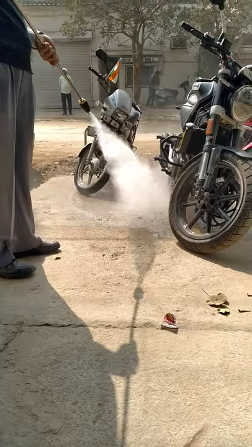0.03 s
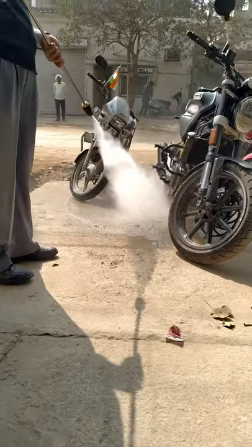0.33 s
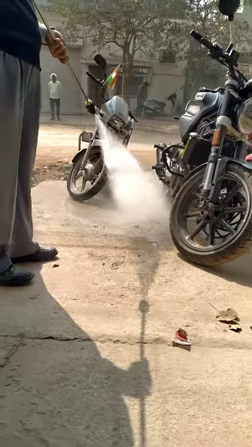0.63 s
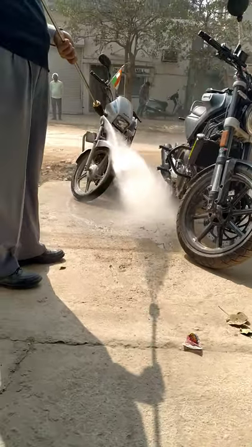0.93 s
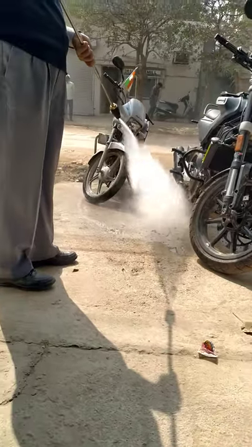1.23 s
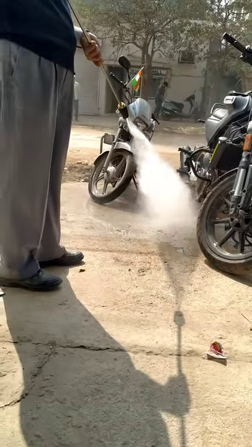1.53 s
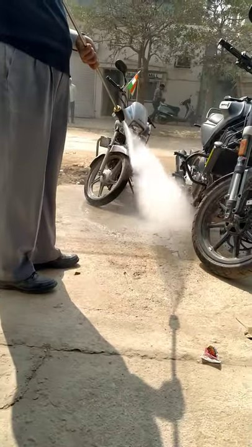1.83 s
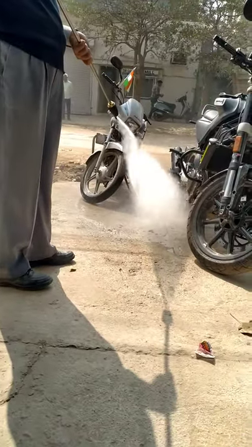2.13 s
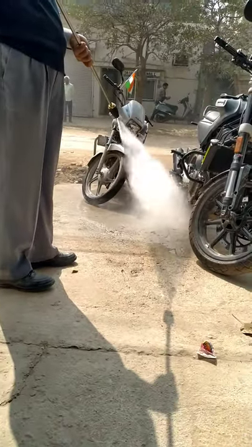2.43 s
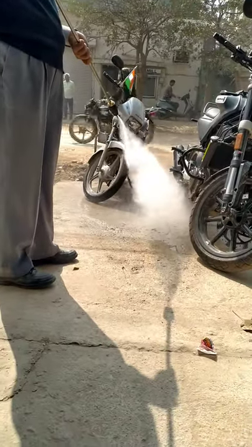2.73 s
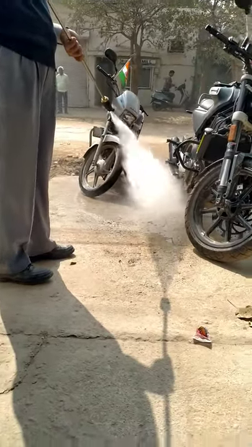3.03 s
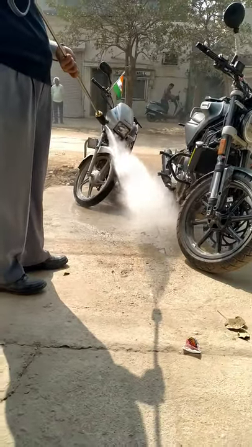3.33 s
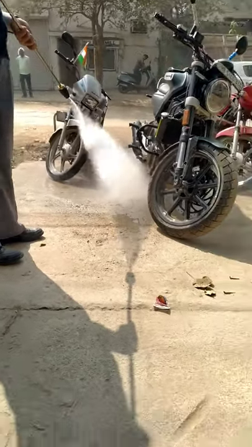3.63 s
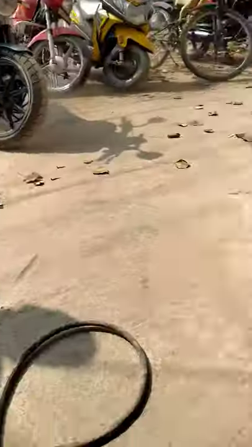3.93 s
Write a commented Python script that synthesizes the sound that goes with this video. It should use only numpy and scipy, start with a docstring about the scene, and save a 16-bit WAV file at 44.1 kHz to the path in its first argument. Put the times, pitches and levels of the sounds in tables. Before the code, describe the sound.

Steady, loud hiss and splatter of a pressure washer jet, with its motor humming underneath.

```python
"""A pressure washer's jet sprays a parked motorcycle and the concrete of an open yard.
The jet hisses, fluttering as the sheet of water tears and pulsing faintly with the pump.
The spray rushes where it lands, larger drops patter, and the air it drags along rumbles.
The pump and a second motor hum nearby, and a motorbike rides by over low street noise."""
import sys
import numpy as np
from scipy import signal
from scipy.fft import rfft, irfft
from scipy.io import wavfile

SR = 44100
rng = np.random.default_rng(int(sys.argv[2]) if len(sys.argv) > 2 else 0)


def log_audio(samples):
    """Write samples as a 16-bit WAV file to the path given in sys.argv[1]."""
    # one column per channel
    frames = np.atleast_2d(samples).T
    # limit to full scale, then quantise
    limited = np.clip(frames, -1, 1)
    pcm = np.round(limited * 32767).astype(np.int16)
    wavfile.write(sys.argv[1], SR, pcm)


N = 176400
TIME = np.arange(N) / SR
DIRECT_SHARE = 0.11   # share of the hiss and splash power that arrives straight, not diffuse

# The hiss as the lance moves. Each row: time in seconds, level in dB before the trim.
JET_LEVEL = [(0.05, -23.9), (0.45, -23.5), (0.9, -23.0), (1.3, -23), (1.9, -22.5), (2.3, -23.1), (2.7, -23),
             (3.3, -23.5), (3.85, -23.5), (4, -25.0)]
# The jet's bright colour. Each row: frequency in Hz, relative level in dB.
JET_COLOUR = [(900, -23.5), (2000, -10), (3000, -7.5), (4300, -6), (5400, -6), (6100, -2.5), (6800, -0.9),
              (7500, 1), (8200, -4)]
def jet(stroke, trim_db=3, flutter_db=.45, pulse_depth=.06):
    """The nozzle's hiss flutters as the sheet of water tears, and swells with each pump stroke."""
    level = from_db(in_time(JET_LEVEL) + trim_db + flutter_db * drift(rate_hz=90))
    pulse = 1 + pulse_depth * np.sin(stroke)
    return level * pulse * stereo_noise(JET_COLOUR, DIRECT_SHARE)


# The weight of the landing spray. Each row: time in seconds, level in dB before the trim.
SPLASH_LEVEL = [(0.05, -30), (0.45, -30.5), (1.3, -30.5), (1.62, -29.5), (2.2, -30.5), (2.8, -30),
                (3.3, -30.5), (3.85, -30), (4, -32)]
# Its midrange body. Each row: frequency in Hz, relative level in dB.
SPLASH_COLOUR = [(200, -11), (400, -1), (600, -0.5), (850, -1), (1080, -3.5), (1300, 0.4), (1550, 0),
                 (2300, -2.5), (3200, -12), (6000, -21)]
def splash(trim_db=2.5, flutter_db=0.6):
    """Spray lands on metal and concrete with a fluttering rush."""
    level = from_db(in_time(SPLASH_LEVEL) + trim_db + flutter_db * drift(rate_hz=45))
    return level * stereo_noise(SPLASH_COLOUR, DIRECT_SHARE)


def drops(per_second=2500, spread_db=3.5, ring_cycles=4, level_db=-34):
    """Larger drops strike at random in each ear, each a tick that dies within a few cycles."""
    patter = np.zeros((2, N))
    pitches = np.geomspace(900, 7400, 14)
    for hz in pitches:
        hits = rng.random((2, N)) < per_second / len(pitches) / SR
        sizes = from_db(spread_db * np.minimum(rng.exponential(1, N), 5)) * rng.choice([-1, 1], N)
        decay = np.exp(-np.log(1000) * hz / (ring_cycles * SR))
        resonator = [1, -2 * decay * np.cos(2 * np.pi * hz / SR), decay * decay]
        patter += signal.lfilter([1, 0, -1], resonator, hits * sizes + 1e-18)
    return from_db(level_db) * rms_one(patter)


# The surges of the low end. Each row: time in seconds, level in dB before the trim.
RUMBLE_LEVEL = [(0.05, -33), (0.25, -41), (0.33, -31.5), (0.42, -38), (0.68, -32.5), (0.8, -32.5),
                (1.05, -34), (1.6, -32.5), (2.2, -35), (2.5, -33), (3.05, -35), (3.25, -31), (4, -34.5)]
# Its dark colour. Each row: frequency in Hz, relative level in dB.
RUMBLE_COLOUR = [(60, -27.5), (120, -7.5), (200, 2), (260, 0), (350, -4.5), (500, -13), (1000, -25.5)]
def rumble(trim_db=-1, lumps_db=1.44):
    """Air dragged along by the spray makes a lumpy, low turbulence."""
    level = from_db(in_time(RUMBLE_LEVEL) + trim_db + lumps_db * drift(rate_hz=14))
    return level * stereo_noise(RUMBLE_COLOUR)


# The pump's pace. Each row: time in seconds, strokes per second.
PUMP_SPEED = [(0, 133.7), (0.5, 133.3), (1.3, 134.25), (2.9, 134.2), (3.5, 134.8), (4, 134.3)]
def pump_stroke():
    """The pump's phase, one turn a stroke, at a nearly steady speed."""
    return turning(in_time(PUMP_SPEED))


# The pump's voice. Each row: multiple of the stroke rate, rms level in dB before the trim.
PUMP_TONES = [(0.871, -41.5), (1.0, -37), (7.98, -45.5), (11.02, -49), (19.0, -50)]
def pump(stroke, hum_trim_db=0.1, whine_trim_db=-0.5):
    """The washer's pump sounds two beating hum tones under a thin whine."""
    hum = sum(tone(k * stroke, db + hum_trim_db, waver_db=1.5, waver_hz=1.5)
              for k, db in PUMP_TONES if k <= 1)
    whine = sum(tone(k * stroke, db + whine_trim_db, waver_db=0.5, waver_hz=2.4)
                for k, db in PUMP_TONES if k > 1)
    return hum + whine


# The motor's partials. Each entry: multiple of the shaft rate.
MOTOR_ORDERS = [3, 9, 10, 12, 13, 14, 15, 40, 76, 90]
# Their mix. Each entry: rms level in dB.
MOTOR_DB = [-40, -46.5, -46, -50, -53, -48.5, -51, -50, -52.5, -49.5]
def motor(shaft_hz=24.29, wobble_hz=0.021):
    """A second motor drones at a steady speed; its upper tones waver more."""
    shaft = turning(shaft_hz + wobble_hz * drift(rate_hz=2))
    drone = tone(MOTOR_ORDERS[0] * shaft, MOTOR_DB[0], waver_db=0.5, waver_hz=1.7)
    return drone + sum(tone(k * shaft, db, waver_db=2.5, waver_hz=1.8)
                       for k, db in zip(MOTOR_ORDERS[1:], MOTOR_DB[1:]))


# The exhaust's partials. Each entry: multiple of the firing rate.
EXHAUST_ORDERS = [2, 3, 4, 5, 6, 7, 8]
# Their mix at the nearest point. Each entry: rms level in dB.
EXHAUST_DB = [-53.5, -44.5, -50.5, -40.5, -38, -42, -48]
def motorbike(firing_hz=31.53, jitter_hz=0.088, nearest_s=2.58, half_pass_s=0.41):
    """A single-cylinder exhaust swells and fades as the bike crosses the yard's opening."""
    firing = turning(firing_hz + jitter_hz * drift(rate_hz=5))
    nearness = 1 / (1 + ((TIME - nearest_s) / half_pass_s) ** 4)
    return nearness * sum(tone(k * firing, db, waver_db=0.5, waver_hz=2.8)
                          for k, db in zip(EXHAUST_ORDERS, EXHAUST_DB))


# The swell of a faint rush. Each row: time in seconds, level in dB.
RUSH_LEVEL = [(0.05, -39), (0.6, -38), (1.3, -47), (2.2, -51), (3.3, -48), (3.8, -36.5), (4, -39)]
# Its single peak. Each row: frequency in Hz, relative level in dB.
RUSH_COLOUR = [(300, -39.5), (700, -16.5), (950, -0.5), (1070, 2.5), (1170, -9.5), (1600, -39.5)]
def narrow_rush():
    """A band of noise around 1 kHz, strongest at the start and the end."""
    return from_db(in_time(RUSH_LEVEL)) * stereo_noise(RUSH_COLOUR)


# The street's bass-heavy colour. Each row: frequency in Hz, relative level in dB.
STREET_COLOUR = [(20, -13), (37, -12.5), (48, -4.5), (80, -2), (120, 1.5), (180, -3.5), (350, -14),
                 (900, -39.5)]
def street(level_db=-41):
    """The street lays a steady, low bed of noise."""
    return from_db(level_db) * stereo_noise(STREET_COLOUR)


# Early reflections. Each row: left delay in seconds, right delay in seconds, gain.
ECHOES = [(.0027, .0021, .1), (.0043, .0049, .08), (.0066, .0083, .07), (.0103, .012, .07)]
def yard(spray):
    """Close reflections off the ground and parked bikes ripple the colour of the spray."""
    out = spray.copy()
    for *delays, gain in ECHOES:
        for ear, delay_s in enumerate(delays):
            out[ear] += gain * np.interp(TIME - np.round(delay_s * SR) / SR, TIME, spray[ear], left=0)
    return out


# Stereo width. Each row: frequency in Hz, correlation between the ears.
LIKENESS = [(170, .975), (260, .9), (400, .6), (560, .66), (900, .36), (1150, .05), (1750, .02), (2100, .3),
            (2900, .02), (3400, .2), (3900, -.02), (5700, .03), (7600, -.15)]
# Stereo lean. Each row: frequency in Hz, left minus right in dB.
BALANCE = [(150, -1.2), (500, 1), (900, 0), (1200, 5), (1900, 1.5), (2800, 1.3), (4200, -0.7), (5500, -2.5),
           (6050, .8), (7700, -.9)]
EARS = np.array([[1], [-1]])   # left, right
CUTOFF_HZ = 7800
def stereo_noise(colour, direct_share=0, left_lag_s=.00016):
    """Coloured noise at unit rms: diffuse, with an optional share straight from the right."""
    hz = np.maximum(np.arange(N // 2 + 1) * SR / N, 1)
    mid, side, straight = rfft(rng.standard_normal((3, N)))
    alike = np.clip(at_hz(LIKENESS, hz), -.99, .99)
    diffuse = np.sqrt((1 + alike) / 2) * mid + EARS * np.sqrt((1 - alike) / 2) * side
    straight = straight * np.exp(-1j * np.pi * hz * left_lag_s * EARS)
    blend = np.sqrt(1 - direct_share) * diffuse + np.sqrt(direct_share) * straight
    gain = from_db(at_hz(colour, hz) + EARS * at_hz(BALANCE, hz) / 2) * (hz < CUTOFF_HZ + 500)
    return rms_one(irfft(gain * blend, N))


def tone(angle, db, waver_db, waver_hz):
    """A machine tone of wavering level; above 300 Hz its phase differs between the ears."""
    hz = (angle[-1] - angle[0]) * SR / N / (2 * np.pi)
    apart = np.arccos(np.clip(at_hz(LIKENESS, hz), -1, 1)) * EARS / 2 * (hz > 300)
    peak = np.sqrt(2) * from_db(db + waver_db * drift(waver_hz))
    return peak * np.sin(angle + rng.uniform(0, 2 * np.pi) + apart)


def drift(rate_hz):
    """Smooth random wander with a spread of about 1."""
    hop, settle = 40, 2000
    pole = np.exp(-2 * np.pi * rate_hz * hop / SR)
    noise = rng.standard_normal(N // hop + settle + 2)
    slow = signal.lfilter([1], [1, -2 * pole, pole * pole], noise)[settle:]
    return np.interp(np.arange(N) / hop, np.arange(len(slow)), rms_one(slow))


def turning(hz):
    """Angle of something that turns at a changing rate."""
    return 2 * np.pi * np.cumsum(hz) / SR


def in_time(rows):
    """A curve's value at every sample."""
    return np.interp(TIME, *np.transpose(rows))


def at_hz(rows, hz):
    """Read a spectrum on a log-frequency axis."""
    row_hz, values = np.transpose(rows)
    return np.interp(np.log(hz), np.log(row_hz), values)


def from_db(db):
    """Decibels to gain."""
    return 10 ** (np.asarray(db) / 20)


def rms_one(x):
    """Scale to unit rms."""
    return x / np.sqrt(np.mean(x ** 2) + 1e-20)


def scene():
    """Spray in front, machines a touch to the right, the street behind."""
    stroke = pump_stroke()
    machines = (pump(stroke) + motor() + motorbike()) * from_db(-.4 * EARS)
    spray = jet(stroke) + splash() + drops()
    return yard(spray) + rumble() + street() + narrow_rush() + machines


def record(dry, start_s=.036, fade_s=0.019):
    """The sound fades in quickly and its top is cut steeply."""
    faded = dry * np.clip((TIME - start_s) / fade_s, 0, 1)
    low_pass = signal.firwin(261, CUTOFF_HZ, window=("kaiser", 9), fs=SR)
    return signal.fftconvolve(faded, low_pass[None], "same", axes=1)


dry = scene()
out = record(dry)
log_audio(out)
```